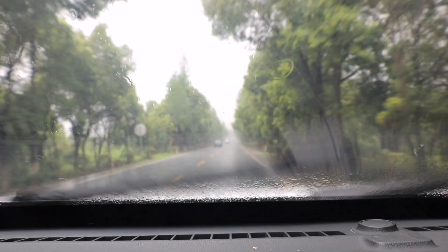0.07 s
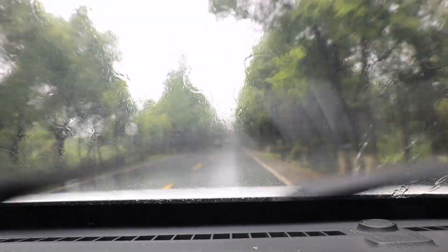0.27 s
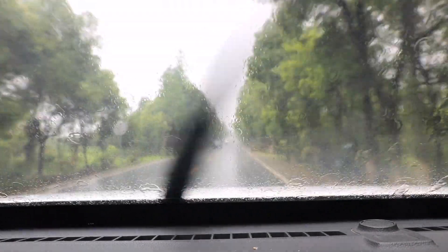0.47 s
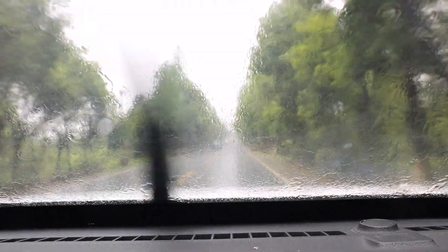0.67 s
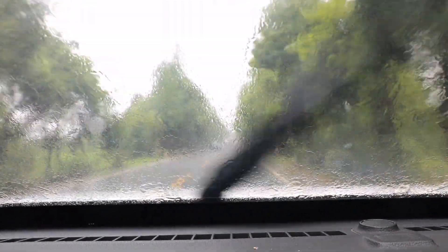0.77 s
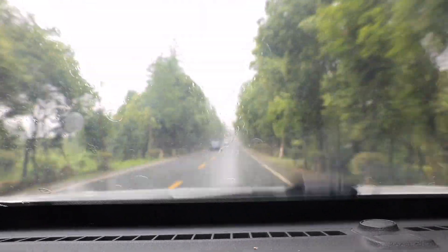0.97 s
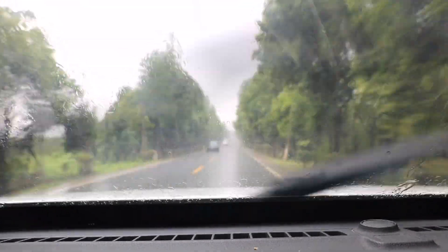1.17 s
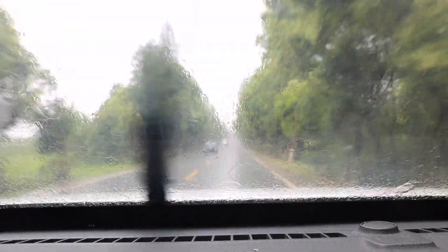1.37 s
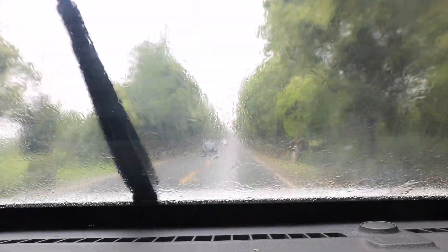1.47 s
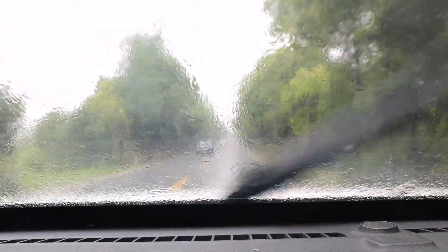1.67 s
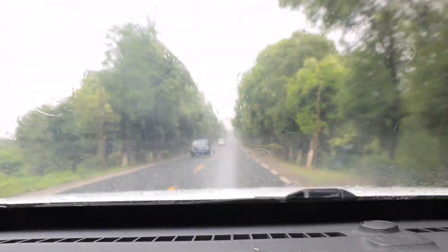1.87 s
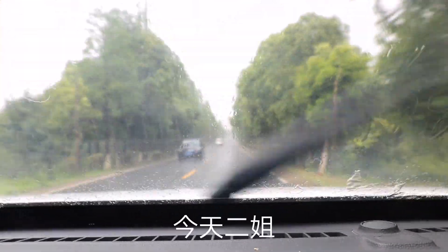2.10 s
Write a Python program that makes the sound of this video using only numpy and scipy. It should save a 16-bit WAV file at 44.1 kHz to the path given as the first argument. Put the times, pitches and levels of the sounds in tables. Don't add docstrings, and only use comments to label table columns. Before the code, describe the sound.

Heavy rain hits a moving car's windshield and roof, heard from inside the small cabin in stereo. After a brief silence it starts abruptly, dense ticks and fat slaps over road boom, engine hum and wiper thumps.

```python
import sys
import numpy as np
from scipy import signal
from scipy.fft import rfft, irfft, next_fast_len
from scipy.io import wavfile
from scipy.ndimage import uniform_filter1d, map_coordinates

SR = 44100
rng = np.random.default_rng(int(sys.argv[2]) if len(sys.argv) > 2 else 0)


def digitize_waveform(pressure):
    field = np.atleast_2d(pressure).T
    bounded = np.clip(field, -1, 1)
    quanta = np.round(bounded * 32767).astype(np.int16)
    wavfile.write(sys.argv[1], SR, quanta)


def how_loud(loudness_db):
    steps = np.asarray(loudness_db, float) / 20
    return 10 ** steps


N = 94241


def unit(x):
    return x / np.sqrt(np.mean(x ** 2) + 1e-20)


def along(points, hz):
    f, v = np.transpose(points)
    return np.interp(np.log(hz + 1), np.log(f + 1), v)


def bumps_db(rings, hz):
    return sum(db / (1 + (2 * (hz - centre_hz) / width_hz) ** 2) for centre_hz, width_hz, db in rings)


def curve(rows):
    s, v = np.transpose(rows)
    return np.interp(np.arange(N) / SR, s, v)


def wobble(rate_hz):
    knots = rng.standard_normal(int(N * rate_hz / SR) + 4)
    return map_coordinates(knots, [np.arange(N) * rate_hz / SR])


def coloured(x, shape_db):
    m = 2 * next_fast_len(N // 2 + 4096)
    gain = how_loud(shape_db(np.fft.rfftfreq(m, 1 / SR)))
    cepstrum = irfft(np.log(np.maximum(gain, 1e-5)), m)
    causal = cepstrum * np.r_[1, np.full(m // 2 - 1, 2), 1, np.zeros(m // 2 - 1)]
    return irfft(rfft(x, m) * np.exp(rfft(causal)), m)[:N]


def ports(pair, mid_db, side_db, balance_db):
    mid = unit(coloured(pair[0] + pair[1], mid_db))
    side = how_loud(balance_db) * unit(coloured(pair[0] - pair[1], side_db))
    both = np.array([mid + side, mid - side])
    return both / np.sqrt(np.mean((both[0] + both[1]) ** 2) / 4)


def patchy(depth_db):
    z = signal.stft(rng.standard_normal((2, N)), nperseg=512)[2]
    field = uniform_filter1d(rng.standard_normal(z.shape[1:]), size=3, axis=0)
    field = uniform_filter1d(field, size=8, axis=1)
    return signal.istft(z * how_loud(depth_db * unit(field)), nperseg=512)[1][:, :N]


def engine():
    cycles = np.cumsum(46.2 + 2.53 * wobble(6)) / SR
    return how_loud(-34.5 + 1.5 * wobble(5.1)) * np.sin(2 * np.pi * cycles)


# (time [s], level [dB])
ROAD_LEVEL = [(.16, -28.5), (.3, -29), (.45, -25.5), (.6, -27), (.75, -29), (.9, -27), (1.1, -27),
              (1.3, -28), (1.5, -28), (1.7, -28.5), (1.85, -25), (2, -29), (2.13, -29)]
# (frequency [Hz], density [dB per Hz])
BOOM_COMMON = [(12, -71), (20, -9.5), (38, 1), (209, -2.5), (367, -9), (642, -13), (742, -17.5),
               (1050, -15.5), (1500, -27.5), (1950, -28), (3300, -120)]
BOOM_DIFFERING = [(12, -47), (20, -17), (107, 0), (439, -5), (630, -2), (1100, -5), (1500, -8), (1950, -35),
                  (3300, -120)]
# (frequency [Hz], width [Hz], height [dB])
CABIN_RESONANCES = [(44.5, 8, 1), (63, 11.4, -6.5), (84, 8.2, 4.5), (122, 24, 0), (212, 9.7, 3.5),
                    (282, 66, 2), (650, 100, 2)]


def road():
    mid_db = lambda hz: along(BOOM_COMMON, hz) + bumps_db(CABIN_RESONANCES, hz)
    side_db = lambda hz: along(BOOM_DIFFERING, hz)
    rumble = patchy(depth_db=1.57) * how_loud(0.52 * wobble(24.0))
    return how_loud(curve(ROAD_LEVEL) + 3.0) * ports(rumble, mid_db, side_db, balance_db=-13.5)


# (time [s], level [dB])
ROOF_LEVEL = [(.16, -40), (.38, -25.5), (.5, -37), (.75, -43), (.92, -33), (1.2, -31.5), (1.27, -23.5),
              (1.31, -28), (1.39, -22), (1.45, -38), (1.73, -27), (1.83, -27.5), (2.06, -36.5), (2.1, -23),
              (2.137, -25.5)]
# (frequency [Hz], density [dB per Hz])
ROOF_SPECTRUM = [(120, -61), (250, -13), (400, -6), (650, -6), (800, -8.5), (1050, -6), (1400, -14),
                 (2200, -20), (4000, -120)]


def roof():
    panel_db = lambda hz: along(ROOF_SPECTRUM, hz)
    drumming = patchy(depth_db=1.5) * how_loud(wobble(35))
    return how_loud(curve(ROOF_LEVEL) - 5.5) * ports(drumming, panel_db, panel_db, balance_db=-4)


# (time [s], level [dB], pitch [Hz])
WIPER_THUMPS = [(.31, -15, 49.4), (0.438, -16.5, 84), (0.444, -26, 215), (.66, -26, 50.6),
                (0.891, -17, 201.7), (0.998, -20, 196), (1.221, -20, 267), (1.255, -22.5, 650),
                (1.35, -17, 105), (1.385, -20, 638), (1.742, -17, 204.6), (1.819, -21.5, 113.5),
                (2.083, -15.5, 184.4)]


def wipers():
    rise_s, t60_s = 0.013, 0.15
    out, t = np.zeros(N + SR), np.arange(SR // 4) / SR
    envelope = how_loud(-60 * t / t60_s) * (1 - np.exp(-t / rise_s))
    for s, db, hz in WIPER_THUMPS:
        drift_rad = np.cumsum(rng.standard_normal(len(t))) * 0.048
        ring = np.sin(2 * np.pi * hz * t + drift_rad) * envelope
        out[round(s * SR):][:len(t)] += how_loud(db + 6) * ring
    return out[:N]


# (frequency [Hz], t60 [s])
CABIN_T60 = [(500, 0.081), (3000, 0.035), (12000, 0.023)]


def cabin_path(splash_t60_s=0.0055, cabin_db=-2):
    port_lag_s = 0.0025
    hz, t, z = signal.stft(rng.standard_normal((2, SR // 16)), SR, nperseg=64)
    decay = how_loud(-60 * t / along(CABIN_T60, hz)[:, None])
    tail = signal.istft(z * decay, SR, nperseg=64)[1]
    t = np.arange(tail.shape[1]) / SR
    impact = rng.standard_normal(len(t)) - 1.55 * (t == 0)
    splash = impact * how_loud(-60 * t / splash_t60_s)
    path = how_loud(cabin_db) * tail / np.linalg.norm(tail[0]) + splash / np.linalg.norm(splash)
    lag = np.round(rng.random(2) * port_lag_s * SR).astype(int)
    return np.array([np.pad(p, (k, 0))[:len(p)] for p, k in zip(path, lag)])


def panned(db, pan_db):
    return how_loud(db + np.array([[.5], [-.5]]) * pan_db)


def patter():
    drops_per_s, spots, size_spread_db, biggest = 2200, 20, 6, 2.5
    clumps = how_loud(1.1 * wobble(41.75) + 0.38 * wobble(11.7))
    out = np.zeros((2, N))
    for _ in range(spots):
        falls = rng.random(N) < drops_per_s / spots / SR
        size = np.minimum(rng.exponential(size=N), biggest)
        taps = falls * how_loud(size_spread_db * size) * clumps
        out += signal.fftconvolve(taps[None], cabin_path(), axes=1)[:, :N]
    return unit(out)


# (time [s], half width [s], swell [dB])
SPRAY_GUSTS = [(.205, .015, 2.5), (.295, .015, 2.5), (.515, 0.019, 4), (.6, 0.03, 2), (.678, .012, 4.5),
               (.742, 0.013, 3.5), (1.04, 0.013, 1), (1.162, 0.007, 1.5), (1.343, .014, 4),
               (1.398, 0.013, 4), (1.525, 0.016, 5), (1.572, 0.021, 6), (1.99, 0.021, 3), (2.102, .012, 4)]


def sprays_db():
    t = np.arange(N) / SR
    return sum(db * np.exp(-((t - s) / half_s) ** 2) for s, half_s, db in SPRAY_GUSTS)


# (time [s], peak [dB], left minus right [dB])
NEAR_TICKS = [(0.1509, -24, 3), (0.1653, -27, 0.0), (0.1972, -19.5, 2.5), (0.2317, -27, -1.0),
              (0.2706, -23, -2.5), (0.291, -23, -2), (0.3404, -25, -0.5), (0.3788, -27, -1.5),
              (0.4008, -26, -2.0), (0.4138, -31, 1.0), (0.4786, -32, 1.0), (0.5085, -22, 1.0),
              (0.5669, -28, -4.0), (0.6173, -25, -1.0), (0.6323, -22, 3), (0.6652, -22, 2.0),
              (0.731, -25, -5), (0.7839, -28, -1.5), (0.7839, -22, 1.0), (0.8203, -25, -1.0),
              (0.8498, -24, 0.0), (0.9391, -23, 0.0), (0.97, -28, 0.0), (1.0378, -16, 1),
              (1.0683, -27, -1.5), (1.1591, -22, -4.0), (1.1591, -29, -3.0), (1.1985, -22, 1.5),
              (1.2279, -24, 1.0), (1.2543, -25, -6), (1.2543, -29, -3.0), (1.2843, -21, -2.5),
              (1.3362, -30, 1.0), (1.385, -32, 1.0), (1.4015, -23.5, 9), (1.4404, -30, 3),
              (1.4753, -31, -1.5), (1.4883, -24, 1.0), (1.5123, -27, 0.5), (1.5247, -21, -0.5),
              (1.5711, -28, -1.0), (1.6055, -21, -2.0), (1.6699, -25.5, -3), (1.7203, -25, -1.0),
              (1.7492, -27, 0.0), (1.8091, -20, 0.0), (1.8435, -28, 1.0), (1.867, -21.5, -1.0),
              (1.9158, -24, 0.0), (1.9712, -37, 2.0), (1.9712, -22.5, 0.0), (1.9817, -22, -4),
              (2.0241, -20.5, -2.0), (2.073, -30, -2), (2.087, -26, 2.5), (2.0949, -22, 0.5)]
# (frequency [Hz], gain [dB])
TICK_SPECTRUM = [(800, -37), (2000, -13), (4000, 4), (8000, 7), (12000, -6), (16000, -13)]


def ticks():
    out = np.zeros((2, N + SR))
    for s, db, pan_db in NEAR_TICKS:
        both = panned(db + 16, pan_db) * cabin_path(splash_t60_s=0.004, cabin_db=-4)
        out[:, round(s * SR):][:, :both.shape[1]] += both
    return np.array([coloured(a[:N], lambda hz: along(TICK_SPECTRUM, hz)) for a in out])


# (time [s], peak [dB], left minus right [dB], brightness [dB])
FAT_DROPS = [(0.1514, -35, -0.5, -16), (0.1644, -28, -1.5, -7), (0.2073, -11.5, -1.0, -28),
             (0.2347, -22, -2, -17), (0.2716, -21, -1.0, -8), (0.292, -10, 2.0, -18),
             (0.3793, -20, -1.5, -17), (0.415, -15, 5, -11), (0.4771, -22, -2, -21),
             (0.4933, -13, 1.5, -17), (0.509, -14.5, 6, -18), (0.532, -14, 4.0, -15),
             (0.5763, -16, -4, -18), (0.6088, -16, -4, -19), (0.6644, -11.5, 0, -14),
             (0.7176, -27, -2.0, -18), (0.731, -14, 9, -17), (0.7831, -22, 1.0, -10),
             (0.8216, -15, -2, -10), (0.8812, -21, -1.0, -19), (0.9031, -18, -3, -12),
             (0.9421, -20, -3, -9), (0.9696, -17, -2, -15), (1.0199, -23, 4, -19),
             (1.0363, -18.5, 0.5, -12), (1.1608, -10, -5, -20), (1.227, -15, 3.0, -21),
             (1.2457, -26, -2, -6), (1.284, -21.5, -2, -7), (1.329, -14.5, -1.0, -22),
             (1.3866, -10, 1.0, -27), (1.426, -22, -1.0, -23), (1.439, -21, 0.5, -19),
             (1.4644, -28, 2.0, -24), (1.476, -17.5, 10, -19), (1.4888, -18, 3, -18),
             (1.5184, -16, 0.0, -13), (1.5557, -22, 8, -12), (1.5661, -13, 1.5, -18), (1.607, -13, -1, -14),
             (1.6415, -16, 0.0, -15), (1.7304, -23, 0.0, -11), (1.8116, -17, -2, -14),
             (1.8447, -15, 1.5, -22), (1.863, -16, 1.0, -12), (1.8914, -12, 1.5, -15),
             (1.9672, -19, -1.0, -12), (1.9947, -8.5, 2.5, -16.5), (2.0241, -10.5, 2, -22),
             (2.0728, -29, -2, -18)]


def big_drops():
    dull, bright = np.zeros((2, 2, N + SR))
    mean_bright_db = np.mean(FAT_DROPS, axis=0)[3]
    for s, db, pan_db, bright_db in FAT_DROPS:
        both = panned(db + 5.5, pan_db) * cabin_path(splash_t60_s=0.0061, cabin_db=1)
        dull[:, round(s * SR):][:, :both.shape[1]] += both
        bright[:, round(s * SR):][:, :both.shape[1]] += how_loud(bright_db - mean_bright_db) * both
    # (frequency [Hz], gain [dB])
    slap = [(200, -49), (500, -1), (1500, 2), (2500, 12.5), (3500, 17.0), (5000, 11.5), (8000, -13),
            (16000, -39)]
    sizzle = [(1000, -40), (3000, -10), (5500, 11.5), (9000, 1.5), (12000, -9.0), (16000, -17)]
    slap_db = lambda hz: along(slap, hz)
    sizzle_db = lambda hz: along(sizzle, hz)
    return np.array([coloured(a[:N], slap_db) + coloured(b[:N], sizzle_db) for a, b in zip(dull, bright)])


# (time [s], level [dB])
RAIN_LEVEL = [(.16, -32), (.3, -31), (.45, -31.5), (.7, -32.5), (.94, -31), (1.12, -30.5), (1.2, -34),
              (1.45, -34), (1.6, -31.5), (1.8, -29), (2.04, -31.5), (2.13, -33)]
# (frequency [Hz], density [dB per Hz])
GLASS_COMMON = [(410, -40), (700, -9), (1730, -6.5), (2250, -2), (2670, -3), (3860, -2.5), (8000, -12),
                (15000, -27.5), (16200, -43)]
GLASS_DIFFERING = [(410, -40), (700, -12), (1090, -7.5), (1480, -6), (2970, 1), (4130, -1.5), (8000, -12),
                   (15000, -29), (16200, -38)]
# (frequency [Hz], width [Hz], height [dB])
GLASS_RESONANCES = [(1700, 156, 6.5), (2216, 250, -7), (2760, 250, 2.5), (3365, 96, 4), (5120, 170, 2),
                    (9760, 550, -2), (12700, 2500, 0)]


def rain():
    drops = how_loud(2.5) * patter() + how_loud(-5) * unit(patchy(depth_db=3.5))
    mid_db = lambda hz: along(GLASS_COMMON, hz) + bumps_db(GLASS_RESONANCES, hz)
    side_db = lambda hz: along(GLASS_DIFFERING, hz) + bumps_db(GLASS_RESONANCES[-2:], hz)
    glass = ports(drops, mid_db, side_db, balance_db=0.8)
    return how_loud(curve(RAIN_LEVEL) + sprays_db() + 3.0) * glass + big_drops() + ticks()


def scene():
    return engine() + road() + roof() + wipers() + rain()


def roll_off(x):
    return signal.sosfilt(signal.butter(12, 16340, fs=SR, output="sos"), x)


def record(dry):
    start_s, fade_s, peak_top, top_hz = 0.152, 0.00056, 0.7, 15780
    fade = np.clip((np.arange(N) / SR - start_s) / fade_s, 0, 1)
    soft = peak_top * np.tanh(dry / peak_top) * fade
    limited = irfft(rfft(soft) * (np.fft.rfftfreq(N, 1 / SR) < top_hz), N)
    mix = limited * (fade > 0)
    return roll_off(mix)


dry = scene()
out = record(dry)
digitize_waveform(out)
```